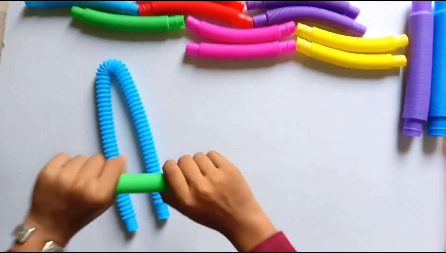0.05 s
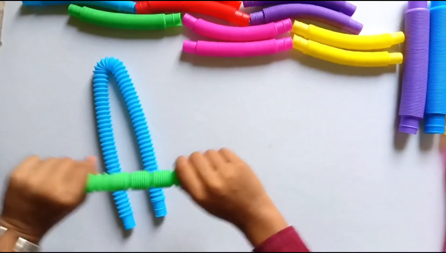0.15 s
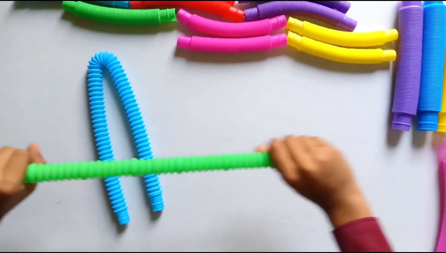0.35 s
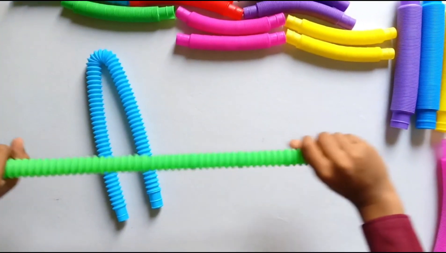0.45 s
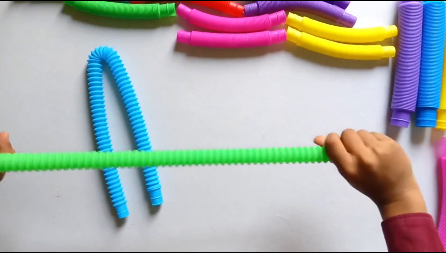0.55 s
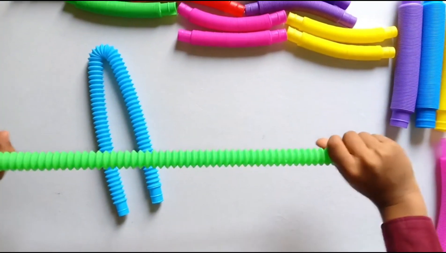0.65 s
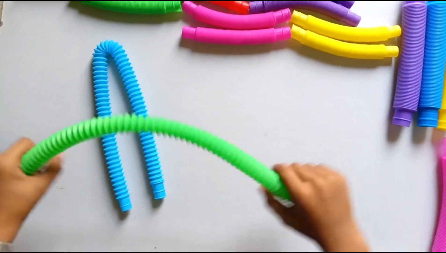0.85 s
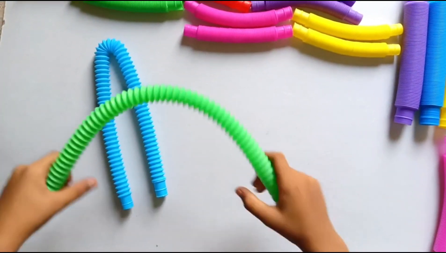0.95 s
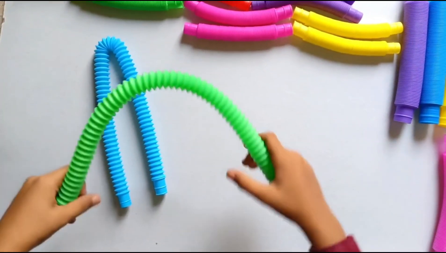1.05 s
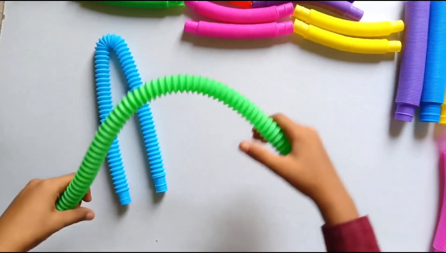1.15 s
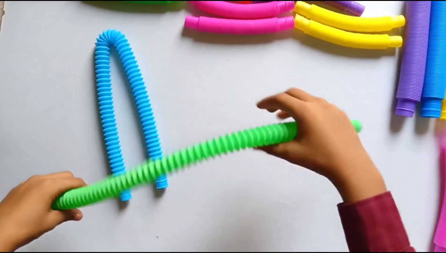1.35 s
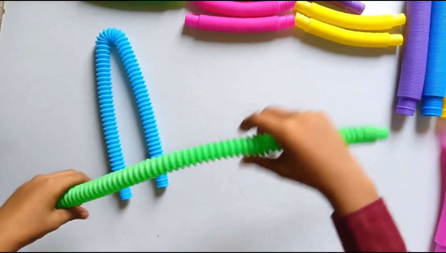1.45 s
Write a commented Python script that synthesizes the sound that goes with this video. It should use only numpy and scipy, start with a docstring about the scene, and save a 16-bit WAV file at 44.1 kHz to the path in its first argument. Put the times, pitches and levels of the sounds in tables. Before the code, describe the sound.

A ribbed plastic tube snaps open fold by fold in one fast ratcheting burst, its hollow note falling as it lengthens. Then hands bump softly on the tube. It is centred right before the microphone in a small, faintly humming room.

```python
"""A quick run of pops, sinking in pitch: a corrugated plastic tube pulled open by hand over a table.
Each fold snaps out and rings the air column, whose note drops as the tube grows longer.
The tube sits dead centre before the microphone in a small room, and the recorder's gain control
ducks everything during the burst. Soft hand thumps and a faint rub follow, over low room hum."""
import sys
import numpy as np
from scipy import signal
from scipy.fft import rfft, irfft
from scipy.io import wavfile
from scipy.ndimage import uniform_filter1d

SR = 44100
rng = np.random.default_rng(int(sys.argv[2]) if len(sys.argv) > 2 else 0)


def transcribe(signal):
    """Save signal, clipped to [-1, 1], as a 16-bit WAV file at the path in sys.argv[1]."""
    frames = np.atleast_2d(signal).T
    limited = np.clip(frames, -1, 1)
    pcm = np.round(limited * 32767).astype(np.int16)
    wavfile.write(sys.argv[1], SR, pcm)


N = 66150

# Folds snapping open. Each row: start in seconds, snap level in dB, snap pitch in Hz, air push in dB,
# tick level in dB, ring time in seconds before the RING_T60_S limits. Levels are relative per column.
FOLDS = [(0.228, 0.5, 1483, -14.5, -27, 0.037), (0.2405, 4, 1414, -16.5, -22.5, 0.039),
         (0.2514, -5.5, 1510, -32, -31, 0.018), (0.2658, 2.5, 2650, -16, -26.5, 0.017),
         (0.2776, 1, 2720, -60, -34, 0.014), (0.2896, 11.5, 1950, -26, -35, 0.0073),
         (0.3042, 3, 2930, -15.5, -24, 0.044), (0.3184, 7.5, 3086, -51, -29.5, 0.019),
         (0.3301, 6, 2810, -20, -25, 0.021), (0.3423, 4, 1210, -28.5, -19.5, 0.027),
         (0.3553, 2, 1100, -13.5, -23, 0.032), (0.3682, 5, 1988, -17, -43, 0.015),
         (0.3728, 5, 2916, -17, -27.5, 0.022), (0.3785, -8, 2580, -12, -25, 0.066),
         (0.3864, 5, 2840, -30, -25, 0.011), (0.397, 2, 1810, -13, -21, 0.064),
         (0.4074, -0.5, 1280, -38, -23, 0.022), (0.4108, 9.5, 2904, -12, -43, 0.014),
         (0.4223, -7, 1500, -22, -43, 0.0097), (0.4235, 10, 1826, -12, -27, 0.0093),
         (0.437, 7.5, 1610, -8.5, -20, 0.014), (0.4483, 4, 1748, -18.5, -19, 0.056),
         (0.4614, 4.5, 1610, -10, -31, 0.023), (0.467, -25, 1780, -16, -32, 0.028),
         (0.4728, 6, 2706, -24, -24, 0.02), (0.4814, 1.5, 1867, -34, -22.5, 0.026),
         (0.4853, 3, 2004, -40, -27, 0.036), (0.4988, 2.5, 1526, -24, -24, 0.018),
         (0.5126, 7.5, 2644, -21.5, -55, 0.011), (0.5188, -2, 2210, -24, -25, 0.049),
         (0.5244, -7, 2440, -9.5, -34, 0.036), (0.5434, -1.5, 2900, -17, -27, 0.037),
         (0.5497, 1, 1434, -28, -55, 0.021), (0.5616, 10, 2983, -30, -21, 0.013),
         (0.569, 0.5, 1790, -18, -47, 0.019), (0.5815, -3, 1450, -33, -25, 0.054),
         (0.5884, -16, 2020, -14, -28, 0.035), (0.6005, 4, 2030, -27.5, -30, 0.011),
         (0.616, 9, 2246, -16, -21.5, 0.011), (0.6375, 8.5, 1925, -13.5, -24.5, 0.021),
         (0.6524, -1, 1327, -14.5, -23.5, 0.019), (0.6761, 5, 2713, -30.5, -32, 0.029),
         (0.6944, -7, 1341, -57, -46, 0.035)]
# Lowest note of the air column. Each row: time in seconds, pitch in Hz.
COLUMN_PITCH = [(.23, 746.7), (0.278, 650), (0.366, 518.3), (0.441, 437.2), (0.522, 385.4), (0.591, 355.8),
                (.65, 329.8), (.695, 332)]
# Tone of a fold's treble tick. Each row: frequency in Hz, relative spectral level in dB.
TICK_SPECTRUM = [(2470, -104), (4200, 7), (5050, -10), (6500, 1.5), (8080, -7), (9450, -5), (15100, -24.5),
                 (16000, -36)]
# Hands shifting on tube and table. Each row: start in seconds, level in dB, pitch in Hz.
HAND_THUMPS = [(.93, -29, 60), (1.113, -23, 116), (1.169, -23.5, 70), (1.195, -25.5, 392),
               (1.261, -23.5, 171), (1.288, -31, 340), (1.481, -17.5, 83.3), (1.477, -24, 296)]
# Hum and hiss of the room. Each row: frequency in Hz, relative spectral level in dB.
ROOM_TONE_SPECTRUM = [(15, -55), (25, -41), (70, 0), (123, -9), (180, -3.5), (270, -11.5), (309, -3.5),
                      (641, -13.5), (887, -12.5), (1190, -16.5), (2760, -24.5), (4610, -55.5), (16000, -73)]

SNAP_RISE_S, RING_T60_S, RING_DB = 0.0011745, (0.006, 0.035), -4.5
CRACK_DB, CRACK_WIDTH_HZ, CRACK_LOW_HZ, JOLT_DB = 2, 2550, 700, 11.5
TICK_DB, TICK_T60_S, TUBE_DB = 8.5, 0.01, 4
NOTE_T60_S, OCTAVE_DB, OCTAVE_T60_S = 0.084, -3.5, 0.086
OVERTONE_DB, OVERTONE_SCATTER_DB, OVERTONE_T60_S = -43, 1.5, 0.2
MODE_RISE_S = 0.0018   # the air column takes a moment to speak
THUMP_RISE_S, THUMP_T60_S = 0.0088, 0.094
RUB_START_S, RUB_LENGTH_S, RUB_DB, RUB_BAND_HZ = 0.87, 0.41, -74, (3500, 6800)
ROOM_DB, ROOM_T60_S, ROOM_TREBLE_DB, SOFT_WALLS_HZ = -1, 0.54, -4.5, 2900
TAIL_BUILD_S, TAIL_FADE_S = 0.0056, 0.11   # the tail steepens after about the fade time
TREBLE_T60_S, TREBLE_SIDE_DB = 0.33, -20
ROOM_TONE_DB, ROOM_TONE_WAVER_DB = -38, 0.5
MIC_LOW_HZ, MIC_HIGH_HZ, CUTOFF_HZ = 281, 3153, 16400
GAIN_KNEE_DB, DUCK_DB_PER_DB, GAIN_TIME_S = -28, 0.27, 0.032


def fold_snaps():
    """Each fold pops out with a noisy crack, a short ring, a push on the air and a treble tick."""
    cracks, rings, pushes, ticks = np.zeros((4, N))
    t = np.arange(2000) / SR
    noise = rng.standard_normal((len(FOLDS), 2, len(t)))
    rise = 1 - np.exp(-t / SNAP_RISE_S)
    radius = np.exp(-np.pi * CRACK_WIDTH_HZ / SR)
    for (start, db, hz, push_db, tick_db, t60), (crack_noise, tick_noise) in zip(FOLDS, noise):
        t60 = np.clip(t60, *RING_T60_S)
        rattle = crack_noise * rise * decay(0.76 * t60, t)   # dies sooner than the ring
        rattle[int(SNAP_RISE_S * SR)] += amp(JOLT_DB)   # the first jolt stands above the rattle
        resonance = [1, -2 * radius * np.cos(2 * np.pi * hz / SR), radius ** 2]
        crack = signal.lfilter([1, 0, -1], resonance, rattle)
        crack /= np.abs(signal.hilbert(crack)).max()
        ring = rise * decay(t60, t) * np.sin(2 * np.pi * hz * t)
        tick = np.sign(tick_noise) * rise * decay(TICK_T60_S, t)
        add(cracks, start, amp(db + CRACK_DB) * crack)
        add(rings, start, amp(db + RING_DB) * ring)
        add(pushes, start, amp([push_db]))
        add(ticks, start, amp(tick_db + TICK_DB) * tick)
    cracks = butter(cracks, 2, CRACK_LOW_HZ, "high")
    colour_gain = np.linalg.norm(colour(signal.unit_impulse(N), TICK_SPECTRUM))
    return cracks, rings, pushes, colour(ticks, TICK_SPECTRUM) / colour_gain


def air_column(snaps, pushes):
    """The lowest two notes answer the pushes; overtones answer the snaps, the higher dying sooner."""
    starts = np.sort(np.transpose(FOLDS)[0])   # the tube grows in steps, one per fold
    latest_start = starts[np.maximum(np.searchsorted(starts, np.arange(N) / SR) - 1, 0)]
    hz = uniform_filter1d(np.interp(latest_start, *np.transpose(COLUMN_PITCH)), size=90)
    notes = air_mode(pushes, hz, NOTE_T60_S) + amp(OCTAVE_DB) * air_mode(pushes, 2 * hz, OCTAVE_T60_S)
    for harmonic, scatter in zip(range(2, 9), rng.standard_normal(7)):
        t60 = OVERTONE_T60_S * (2 / harmonic) ** 0.5
        notes += amp(OVERTONE_DB + OVERTONE_SCATTER_DB * scatter) * air_mode(snaps, harmonic * hz, t60)
    return notes


def air_mode(drive, hz, t60):
    """One resonance of the tube's air, moving in pitch: a click swells and rings out."""
    phasor = np.exp(2j * np.pi * np.cumsum(hz) / SR)
    swelling = lag(drive / phasor + 1e-18, MODE_RISE_S)
    ringing = signal.lfilter([1], [1, -amp(-60 / (t60 * SR))], swelling)
    return np.imag(phasor * ringing)


def hand_thumps():
    """Hands shift on tube and table with soft, low thumps."""
    thumps = np.zeros(N)
    t = np.arange(6000) / SR
    envelope = (1 - np.exp(-t / THUMP_RISE_S)) * decay(THUMP_T60_S, t)
    for start, db, hz in HAND_THUMPS:
        add(thumps, start, amp(db) * envelope * np.sin(2 * np.pi * hz * t))
    return thumps


def finger_rub():
    """Fingers rub the ribs in one faint, grainy stroke."""
    grains = rng.standard_normal(N) * rng.exponential(1, N)
    rub = unit_rms(butter(grains, 2, RUB_BAND_HZ, "band"))
    progress = np.clip((np.arange(N) / SR - RUB_START_S) / RUB_LENGTH_S, 0, 1)
    return amp(RUB_DB) * np.sin(np.pi * progress) * rub


def diffuse_tail(sound, t60):
    """Smear a sound into a dense tail that builds for a few milliseconds and dies away."""
    t = np.arange(SR // 2) / SR
    envelope = np.minimum(t / TAIL_BUILD_S, 1) * decay(t60, t) * np.exp(-(t / TAIL_FADE_S) ** 3)
    tail = rng.standard_normal(len(t)) * envelope
    return signal.fftconvolve(sound, tail / np.linalg.norm(tail))[:N]


def room_tone():
    """Hum and hiss in the background, wavering a little."""
    drift = uniform_filter1d(rng.standard_normal(N), size=1500)
    waver = unit_rms(uniform_filter1d(drift, size=1500))
    hum = unit_rms(colour(rng.standard_normal(N), ROOM_TONE_SPECTRUM))
    return amp(ROOM_TONE_DB + ROOM_TONE_WAVER_DB * waver) * hum


def amp(db):
    """dB to gain."""
    return 10 ** (np.asarray(db) / 20)


def unit_rms(x):
    """Scale to rms 1."""
    return x / np.sqrt(np.mean(x ** 2) + 1e-20)


def colour(x, spectrum):
    """Shape by a spectrum table."""
    hz, db = np.transpose(spectrum)
    bin_hz = np.maximum(np.arange(N // 2 + 1) * SR / N, 1)
    return irfft(rfft(x) * amp(np.interp(np.log(bin_hz), np.log(hz), db)), N)


def butter(x, order, hz, kind):
    """Butterworth filter."""
    return signal.sosfilt(signal.butter(order, hz, kind, fs=SR, output="sos"), x)


def lag(x, seconds):
    """One-pole smoothing."""
    pole = np.exp(-1 / (seconds * SR))
    return signal.lfilter([1 - pole], [1, -pole], x)


def decay(t60, t):
    """Fall by 60 dB every t60 seconds."""
    return amp(-60 * t / t60)


def add(track, start_s, piece):
    """Mix a piece in at a time."""
    i = int(start_s * SR)
    track[i:i + len(piece)] += piece[:len(track) - i]


def scene():
    """Tube dead centre at the microphone; the treble is slightly wide."""
    cracks, rings, pushes, ticks = fold_snaps()
    # mostly the crack feeds the tube's overtones and the room; the ring stays nearly dry
    feed = cracks + amp(-13.5) * rings
    air = air_column(feed, pushes)
    reflections = diffuse_tail(butter(feed + air, 1, SOFT_WALLS_HZ, "low"), ROOM_T60_S)
    body = cracks + rings + air + amp(ROOM_DB) * reflections
    body = butter(body, 4, MIC_LOW_HZ, "high")
    body = butter(body, 7, MIC_HIGH_HZ, "low")
    treble = ticks + amp(ROOM_TREBLE_DB) * diffuse_tail(ticks, TREBLE_T60_S)
    side = amp(TUBE_DB + TREBLE_SIDE_DB) * diffuse_tail(ticks, TREBLE_T60_S)
    mid = amp(TUBE_DB) * (body + treble) + room_tone() + hand_thumps() + finger_rub()
    return np.array([mid + side, mid - side])


def record(dry):
    """The recorder's gain control turns loud passages down, peaks clip and the top is cut."""
    power = lag(np.mean(dry ** 2, axis=0), GAIN_TIME_S)
    level_db = 10 * np.log10(power + 1e-12)
    duck_db = DUCK_DB_PER_DB * np.maximum(level_db - GAIN_KNEE_DB, 0)
    clipped = np.clip(dry * amp(-duck_db), -0.97, 0.97)
    top_cut = signal.cheby2(16, 70, CUTOFF_HZ, fs=SR, output="sos")
    return np.clip(signal.sosfilt(top_cut, clipped), -1, 1)


dry = scene()
out = record(dry)
transcribe(out)
```